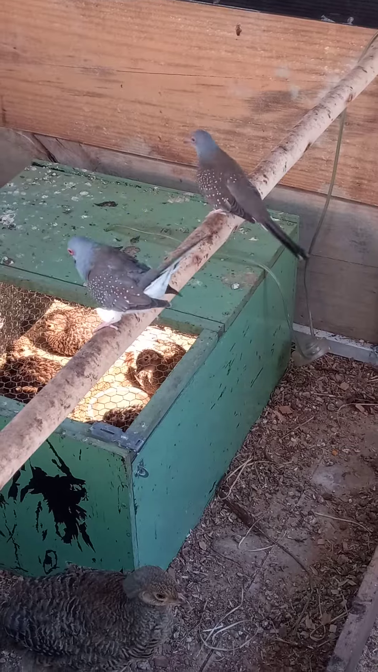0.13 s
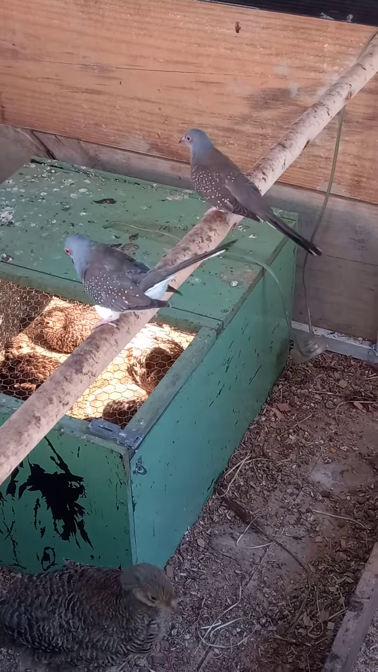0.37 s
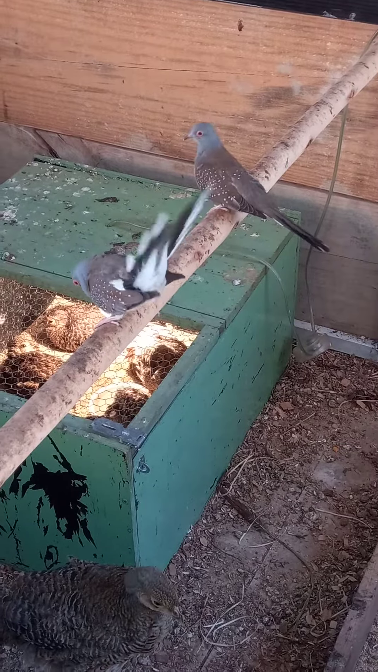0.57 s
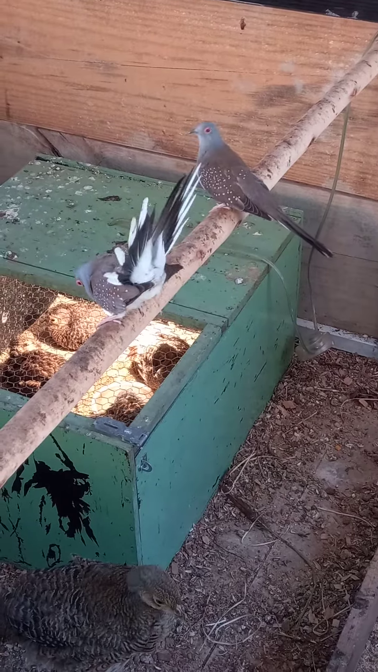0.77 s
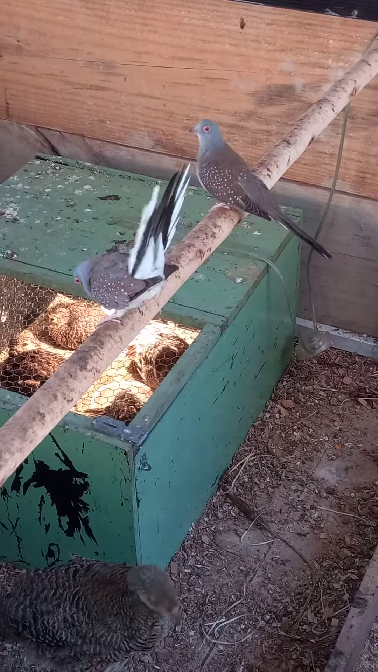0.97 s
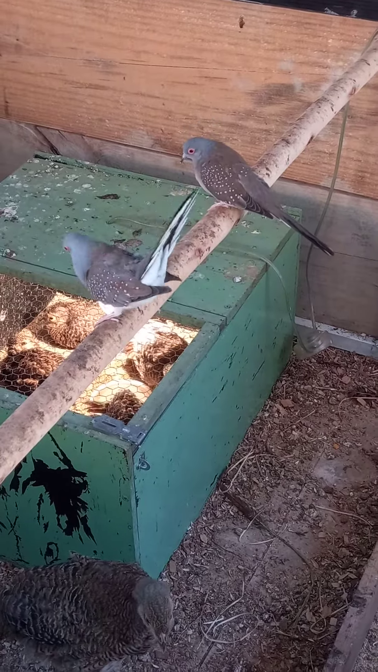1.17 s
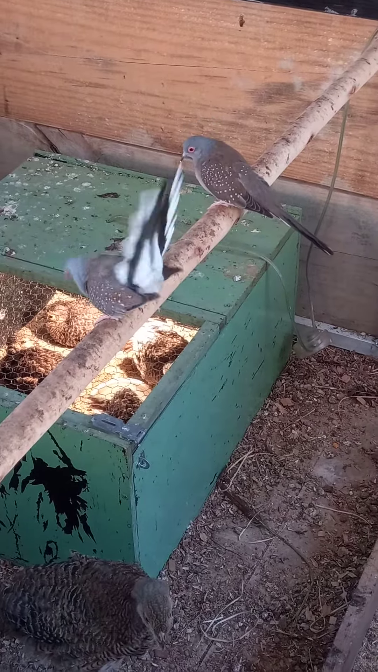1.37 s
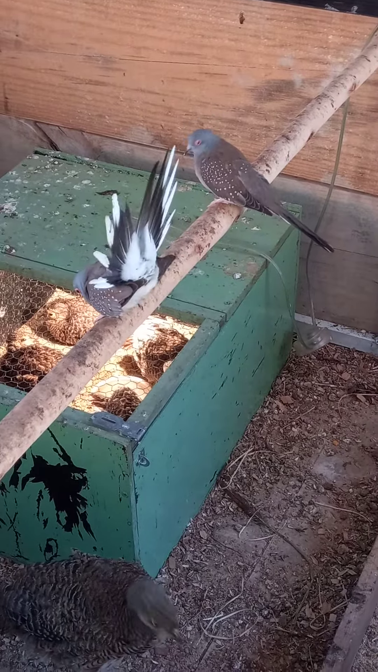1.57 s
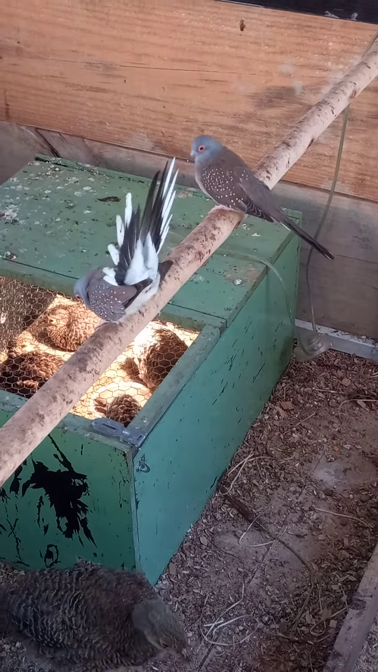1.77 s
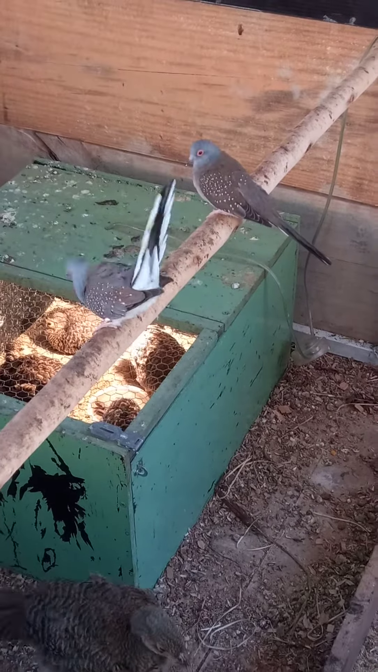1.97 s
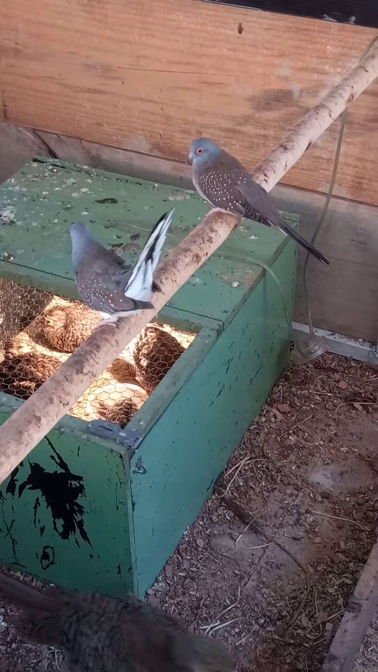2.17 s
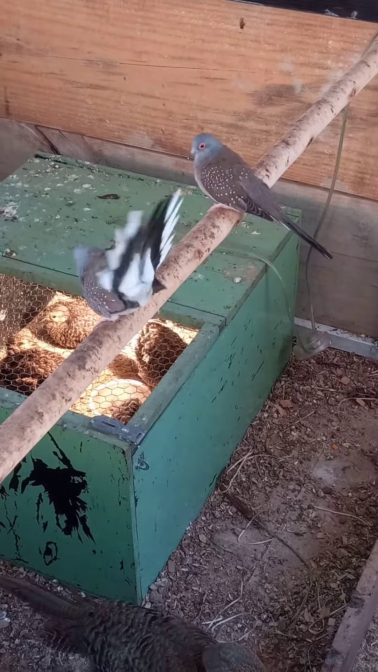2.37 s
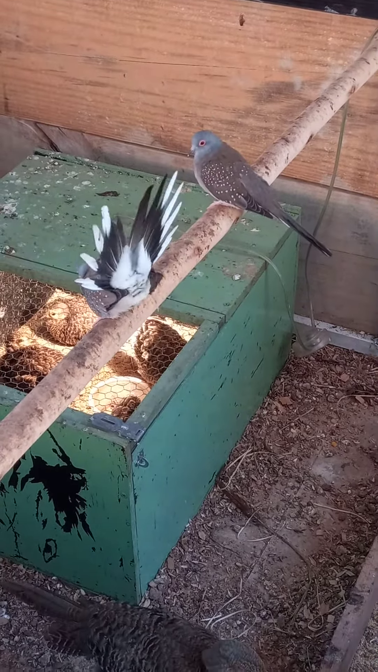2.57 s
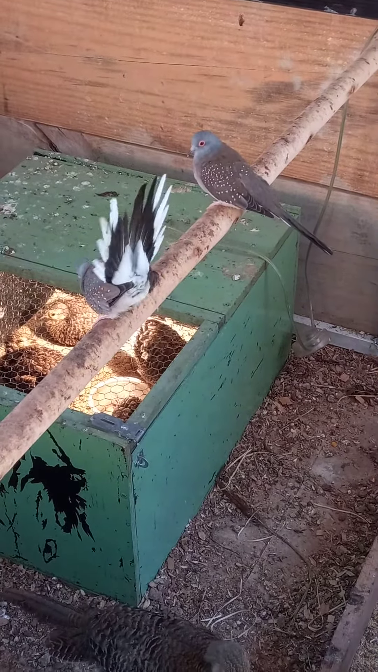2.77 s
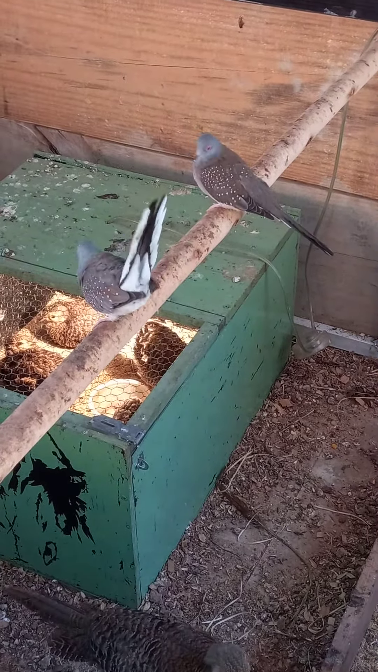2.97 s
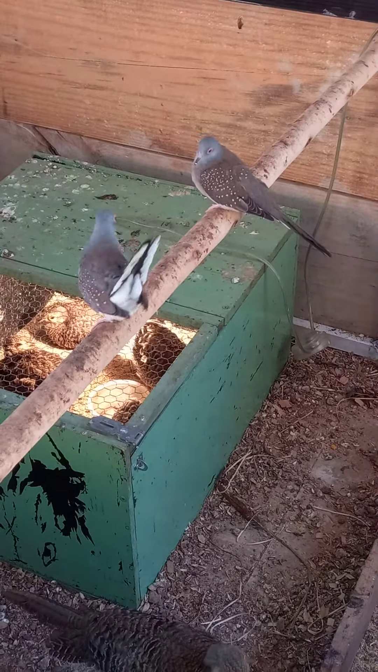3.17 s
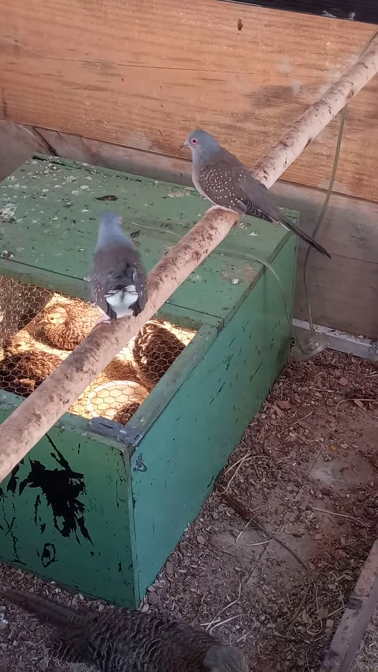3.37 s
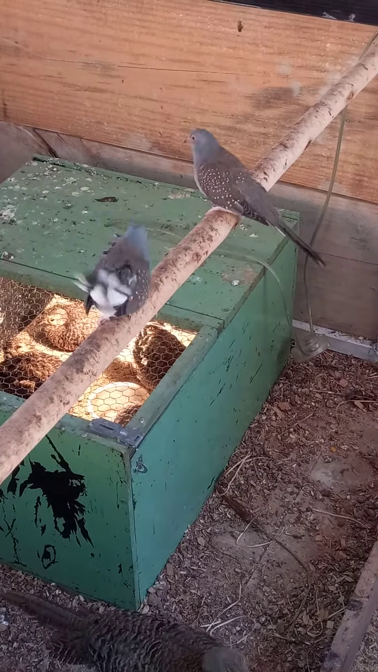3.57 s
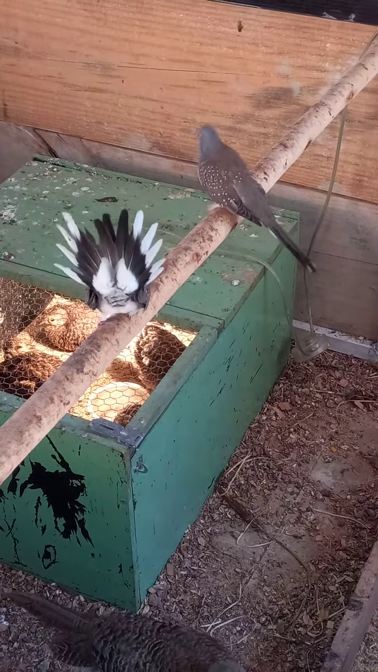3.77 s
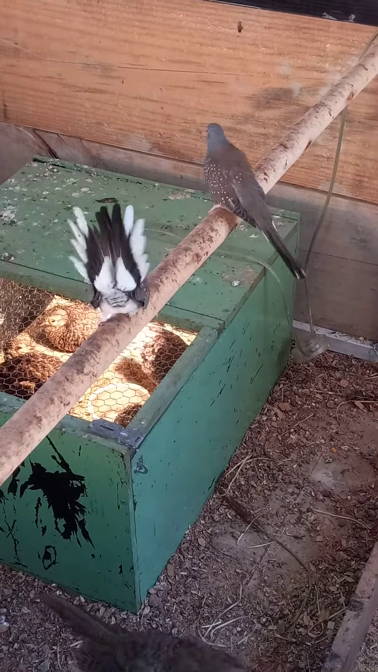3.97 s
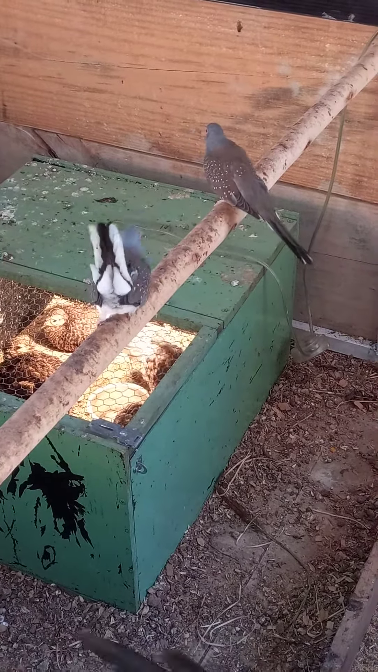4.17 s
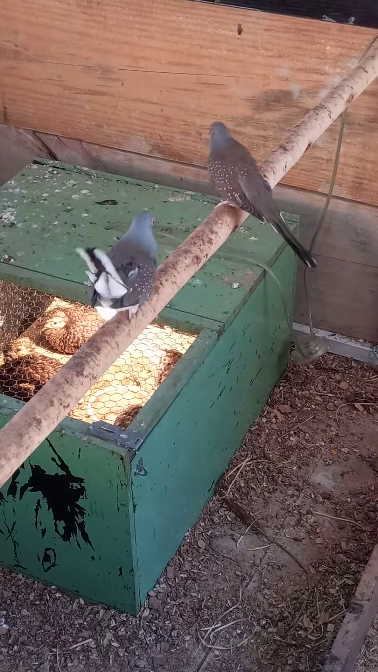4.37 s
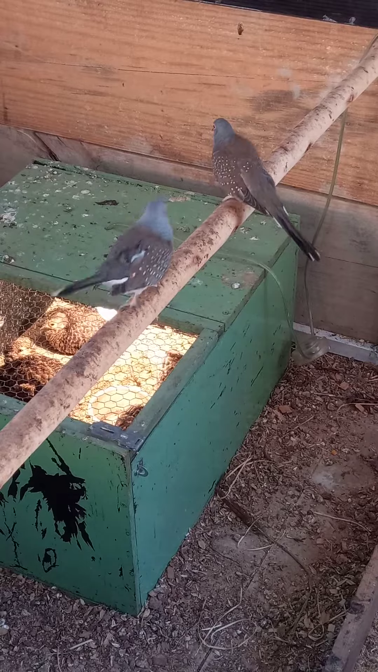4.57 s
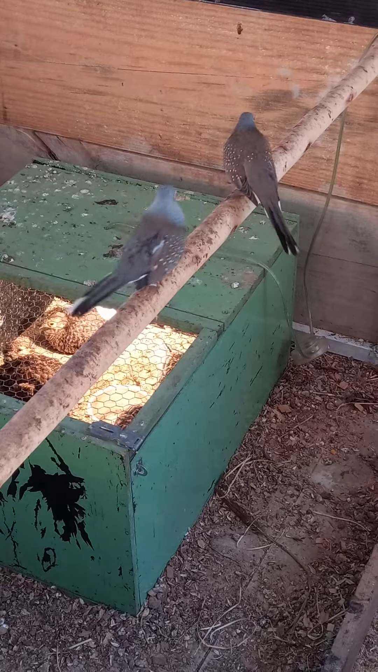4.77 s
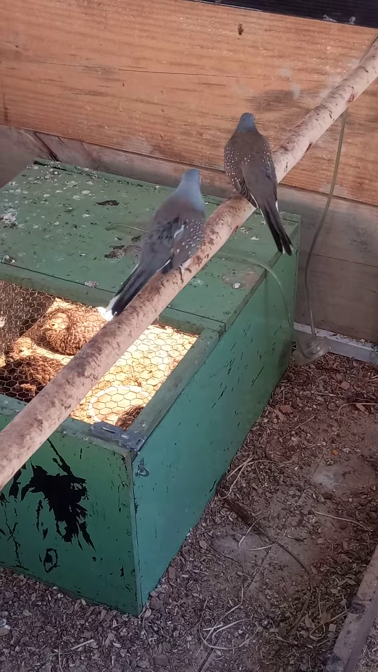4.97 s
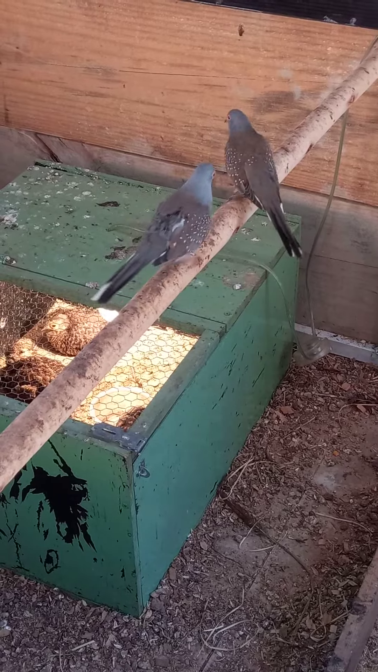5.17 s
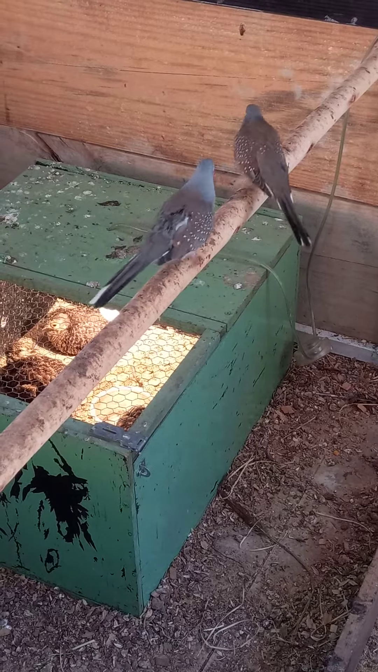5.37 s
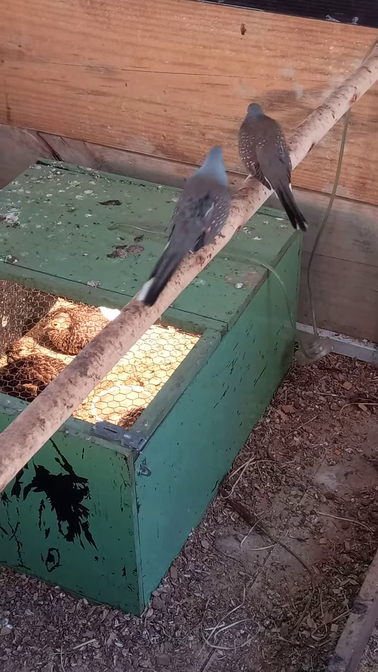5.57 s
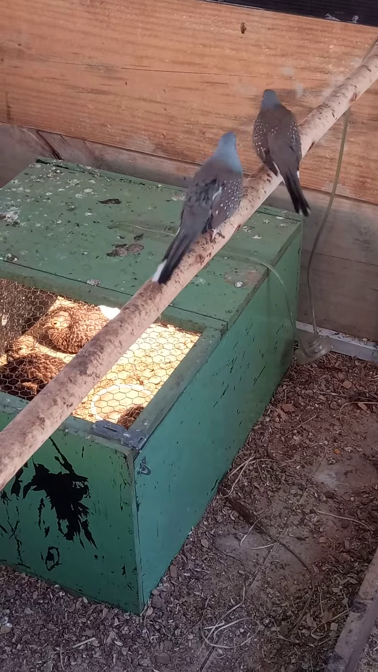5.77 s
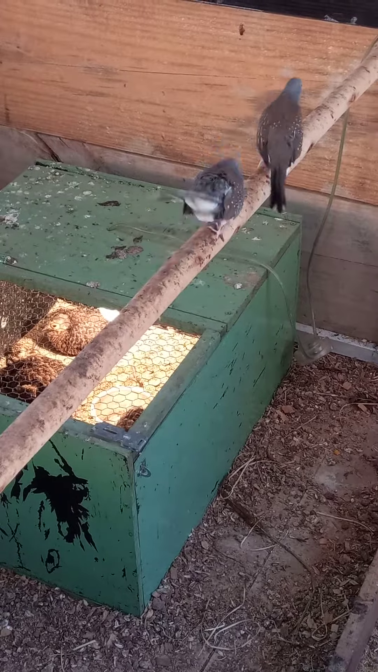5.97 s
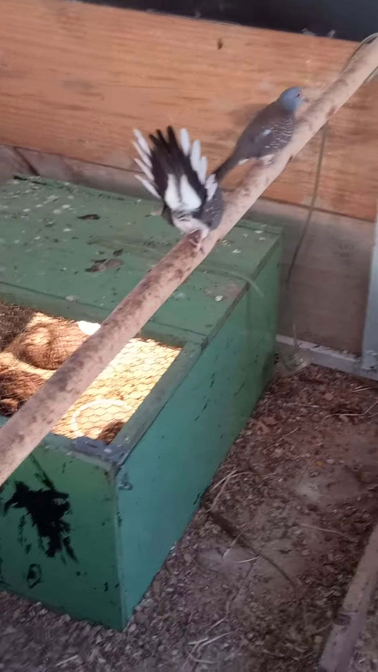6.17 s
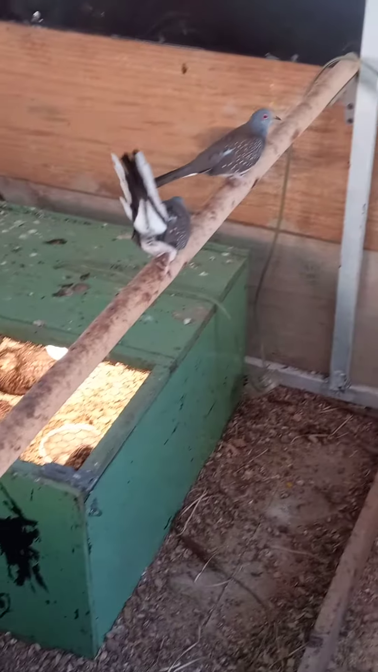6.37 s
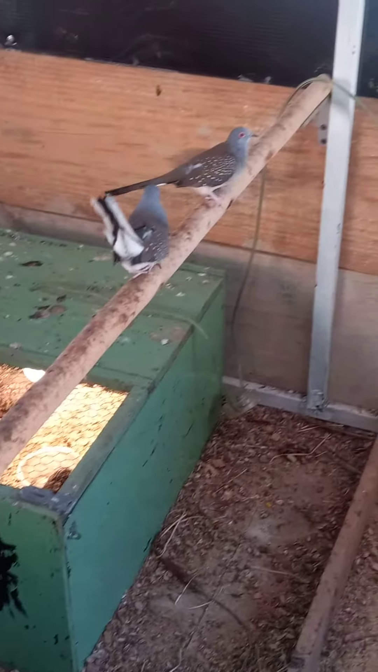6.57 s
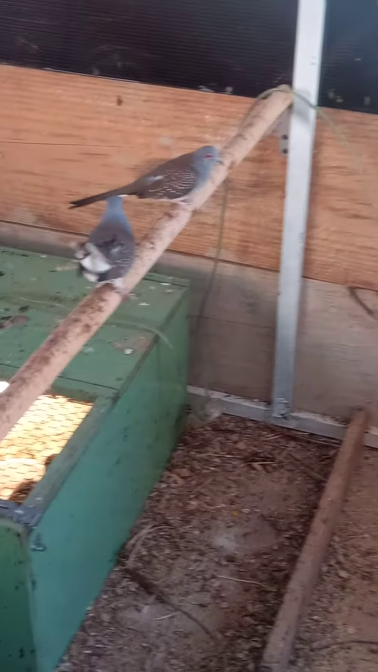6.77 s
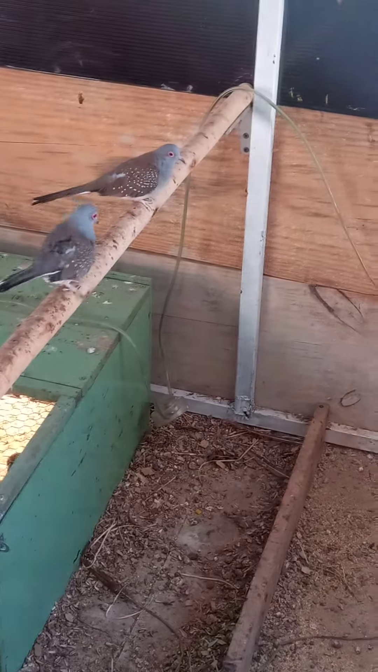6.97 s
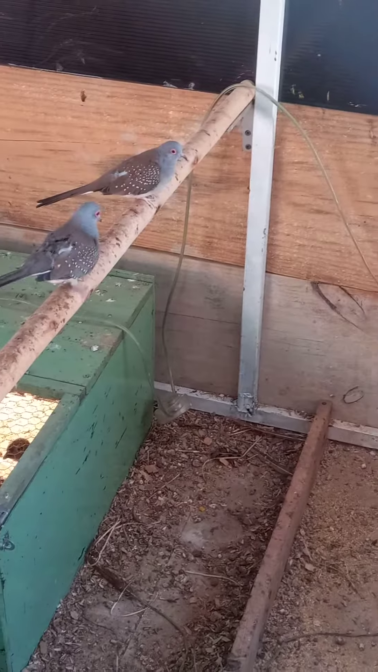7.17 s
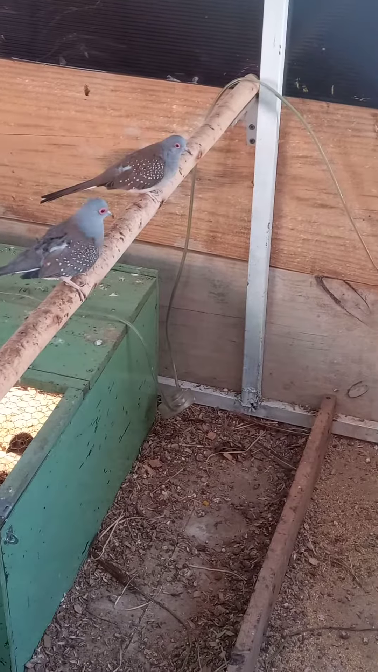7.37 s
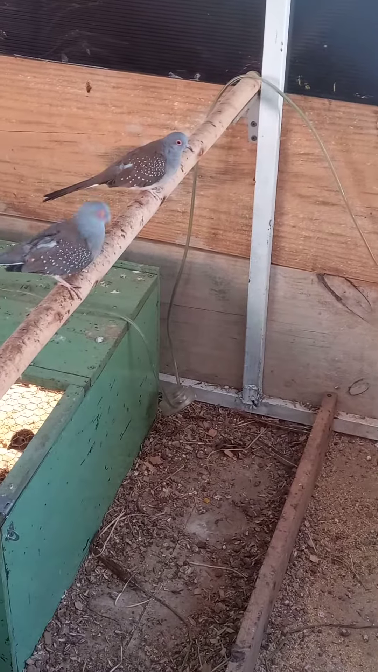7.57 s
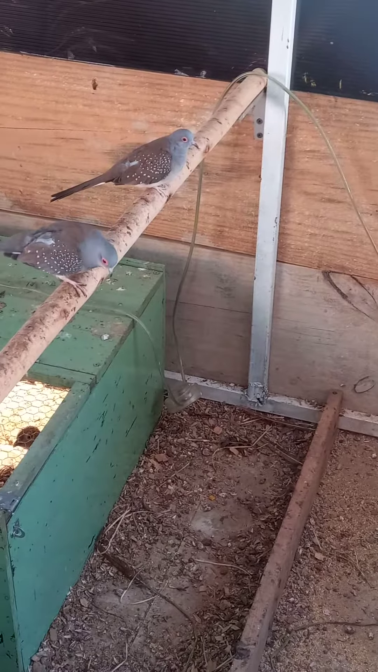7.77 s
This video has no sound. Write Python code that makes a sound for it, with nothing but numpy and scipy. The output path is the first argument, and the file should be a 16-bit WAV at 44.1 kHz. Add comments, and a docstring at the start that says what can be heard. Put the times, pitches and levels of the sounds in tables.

```python
"""Cooing dove in an aviary

A bowing diamond dove coos six times in a wooden aviary, the first coo already under way: tones edged by rasps.
The voice is a gliding sine; in the rasps a lower sine and throat pulses roughen it. A second dove answers softly.
Shaped noise makes rustling feathers and litter, wing puffs and clicks; decaying sines knock on the perch.
Small birds chirp in sine glides, twitter and pip, over rumble, a passing hum and hiss."""
import sys
import numpy as np
from scipy import signal
from scipy.fft import rfft, irfft, next_fast_len
from scipy.io import wavfile
from scipy.ndimage import map_coordinates

SR = 44100
rng = np.random.default_rng(int(sys.argv[2]) if len(sys.argv) > 2 else 0)


def bounce(signal):
    """Save signal as a 16-bit WAV file at the path given by the first command-line argument."""
    frames = np.transpose(np.atleast_2d(signal))
    limited = np.clip(frames, -1, 1)
    pcm = np.round(limited * 32767).astype(np.int16)
    wavfile.write(sys.argv[1], SR, pcm)


N = 344761
TIME = np.arange(N) / SR  # s

# Event levels and spectra are relative settings; each source trims its own mix.
# main dove's coos: [t/s, opening rasp/s, clear tone/s, closing rasp/s, fade t60/s,
# opening level/dB, tone level/dB, closing level/dB, top f/Hz, held f/Hz, f at the break/Hz]
COOS = [(-.42, .15, .41, 0.11, 0.35, -40.5, -36.5, -35, 852, 845, 827.8),
        (.607, 0.093, .42, 0.074, 0.23, -38.5, -38, -34, 856, 834.4, 806),
        (1.496, 0.093, 0.39, 0.12, .26, -36, -38, -34, 850.7, 817, 814),
        (2.504, 0.1678, 0.3016, 0.075, .25, -36, -34, -37, 828.2, 805, 800),
        (3.738, 0.149, .29, 0.085, .38, -34, -36, -34.5, 842, 814, 818),
        (6.049, 0.16, 0.33, 0.12, 0.2, -38.5, -33.5, -35.5, 849, 827.6, 832)]
# vocal effort through a coo: [stage (0 start, 1 clears, 2 breaks, 3 fades), tone level/dB]
EFFORT = [(0, -5.5), (.9, -4), (1.3, -0.5), (1.55, -0.5), (1.75, -4), (1.97, -0.5), (2.3, -2.5), (3, -4.5)]
# left-right balance of the main dove's voice, positive to the left: [t/s, level/dB]
BALANCE = [(.2, -2), (.8, -2.5), (1.3, -1.1), (1.8, -4), (2.1, 1), (2.75, -4), (3.3, -8), (3.8, -0.1),
           (4.2, -8), (6.1, -2), (6.4, 2.5), (6.7, 0)]
# ring of the inflated throat: [f/Hz, level/dB]
THROAT = [(300, -45), (430, -33), (495, -24), (560, -32.5), (615, -15), (670, 1.5), (735, -7), (820, -8),
          (880, -17.5), (950, -21.5), (1050, -30.5), (1300, -44), (2000, -77)]
# second dove's sinking coos: [t/s, length/s, starting f/Hz, level/dB, fade/(dB per s), octave level/dB]
ANSWERS = [(1.972, 0.37, 765.8, -46.5, 0.5, -54.5), (2.918, 0.4, 769.7, -38.5, 27, -54)]
# second dove's lone rasps: [t/s, length/s, level/dB]
SOFT_RASPS = [(5.04, .11, -58.5), (5.336, 0.081, -61)]
# rasp colour of the farther throat: [f/Hz, level/dB]
FAR_THROAT = [(350, -44), (560, -13.5), (660, 3), (770, -0.5), (860, -11.5), (1000, -15), (1800, -47.5)]
# strokes through litter and feathers: [t/s, rise/s, t60/s, coarse level/dB, fine level/dB]
RUSTLE_STROKES = [(1.086, 0.023, .77, -64, -87.5), (1.39, 0.12, .5, -55.5, -71.5),
                  (1.702, 0.034, 0.66, -66, -71.5), (2.001, 0.09, 1, -69.5, -85.5),
                  (2.22, 0.18, 0.44, -71, -86.5), (2.608, 0.0026, 0.87, -50, -61),
                  (2.859, 0.012, 0.77, -60.5, -61.5), (2.971, .06, 0.29, -60.5, -66.5),
                  (3.11, .03, 0.98, -66, -83), (3.441, .036, 1, -62, -70), (3.65, .07, 0.67, -60.5, -75),
                  (3.979, .05, 0.74, -67, -81), (4.178, 0.0042, 0.7, -79, -79),
                  (4.251, 0.042, .52, -44, -69), (4.468, 0.0054, 0.27, -86, -76),
                  (4.624, 0.036, 0.52, -49.5, -64), (5.43, .016, 0.94, -67.5, -100.5),
                  (6.15, 0.024, 0.99, -62, -82), (6.368, .05, 1, -74.5, -79.5),
                  (6.62, 0.071, 0.59, -66, -78.5), (7.67, 0.034, .5, -75, -92)]
# coarse rub of litter: [f/Hz, level/dB]
LITTER = [(600, -35.5), (1000, -11.5), (1300, -1), (1650, -1), (2100, 5.5), (2500, -7.5), (3000, -15.5),
          (4300, -17.5), (5300, -27), (6700, -23), (7600, -37), (12000, -76.5)]
# fine rub of feathers: [f/Hz, level/dB]
FEATHER = [(2000, -41.5), (3500, 2.5), (5000, 3.5), (6700, 8), (7500, -5), (11000, -6), (15500, -11)]
# air pushed by wings and the fanned tail: [t/s, rise/s, t60/s, level/dB]
FLAP_STROKES = [(1.39, .13, 0.55, -48.5), (1.69, 0.056, .5, -52.5), (1.93, 0.015, 1, -67.5),
                (2.71, .04, .3, -63), (2.85, 0.063, 0.14, -52), (2.99, 0.066, 0.28, -40),
                (3.64, 0.059, .42, -51.5), (3.98, 0.046, 1, -55), (4.24, .06, 0.77, -53.5),
                (5.43, 0.018, 0.25, -68.5), (6.11, .02, .8, -65), (6.35, 0.03, 0.54, -60.5)]
# colour of the pushed air: [f/Hz, level/dB]
PUFF = [(30, -43), (55, -9), (82, 3.5), (130, 4), (200, -1.5), (340, 3.5), (480, -5.5), (900, -9.5),
        (1500, -13), (3000, -65.5)]
# feet on the perch: [t/s, thud level/dB, tick level/dB]
FOOTFALLS = [(1.45, -37.5, -61), (1.519, -57.5, -72.5), (2.028, -47, -78), (2.768, -44.5, -63),
             (2.978, -40, -38.5), (3.04, -28, -44.5), (3.066, -38, -65.5), (3.09, -37.5, -60.5),
             (4.516, -43, -78), (4.827, -51.5, -75), (6.392, -39, -73.5), (6.79, -49, -86.5)]
# modes of the pole: [f/Hz, level/dB, t60/s]
PERCH_MODES = [(83.5, 5.5, 0.2), (139.5, -7, 0.62), (196, -5, .15), (335, -11, 0.071), (440, -13.5, 0.14)]
# snaps of claws and quills: [t/s, starting level/dB, left-right level/dB]
SNAPS = [(0.891, -64, 7), (2.6183, -57, 9.5), (2.8648, -53.5, 13.5), (3.036, -49.5, 11.5), (4.184, -71, 2),
         (4.4704, -65, 10.5), (4.629, -69, 10.5), (7.188, -67, 8.0)]
# whistles and soft low notes: [t/s, length/s, start f/Hz, end f/Hz, level/dB,
# left-right level/dB, distance (0 near to 1 far)]
CHIRP_NOTES = [(.36, .08, 4510, 3680, -72, -11, .8), (0.511, 0.096, 575.5, 540, -54.5, -5, 1),
               (0.594, 0.07, 1693, 4120, -58, -8.5, 0.68), (1.382, .089, 599, 586, -55, -1, 0.34),
               (1.469, 0.064, 1685, 2380, -50, -12, 0.7), (1.525, 0.07, 2525, 4420, -64, 8, .5),
               (2.236, .13, 1436, 2220, -64.5, -18, 1), (2.368, .08, 2590, 4250, -65, 3, 0.53),
               (2.56, 0.046, 1660, 2770, -60.5, -11.5, .9), (2.671, 0.023, 2160, 1750, -34, -16, 0.19),
               (3.537, 0.046, 1680, 2514, -49, -15, .5), (3.559, 0.036, 2500, 4450, -64, 6, 1),
               (4.487, .043, 1880, 3570, -63.5, -4, 0.33), (3.651, 0.081, 311, 331, -52, -2.5, .5),
               (4.81, 0.053, 463, 500, -63.5, -6, 0.74), (5.088, 0.071, 5200, 4080, -65.5, 5, 0.7),
               (5.401, 0.042, 1905, 3260, -69.5, -4, 0.65), (5.502, .075, 2820, 4940, -69.5, 7, 0.77),
               (5.635, 0.057, 2800, 1650, -57, -15, .5), (5.695, 0.069, 1667, 1663, -51.5, -7, 0.49),
               (5.697, 0.039, 4874, 5275, -66, 13, 0.87), (6.015, 0.14, 395, 460, -52.5, -13, 0.35),
               (6.469, 0.078, 5010, 3490, -67.5, -12, 0.99), (7.23, 0.14, 4530, 3560, -72.5, -4, 0.86),
               (7.663, .096, 1750, 2146, -69.5, -13, 0.96)]
# bouts of distant twitter: [t/s, length/s, t60/s, level/dB]
TWITTER_BOUTS = [(0, .45, .5, -80.5), (0.491, 0.3, 0.38, -73), (1.54, 0.26, .2, -79.5),
                 (3.44, 0.18, .3, -76), (6.145, .04, 0.61, -72), (6.35, 0.32, 1.5, -71.5),
                 (7.172, 0.16, 1.3, -75.5), (7.702, .05, .6, -82.5)]
# colour of distant twitter: [f/Hz, level/dB]
FAR_BIRDS = [(2400, -36), (3400, -11.5), (4300, -6.5), (5200, -8), (6500, -35)]
# nasal finch pips: [t/s, level/dB]
FINCH_PIPS = [(6.33, -69), (6.618, -64), (6.881, -69), (7.18, -66), (7.439, -80.5), (7.71, -74)]
# colour of the outdoor rumble: [f/Hz, level/dB]
AIR = [(20, -39), (45, -20), (82, 0.5), (115, -3.5), (165, -16.5), (245, -16.5), (400, -19), (700, -23),
       (1100, -28), (2200, -74.5)]
# strength of the outdoor rumble: [t/s, level/dB]
AIR_LEVEL = [(0, -62.5), (.6, -69.5), (1.2, -61), (2.3, -63.5), (3.5, -61), (4.9, -67.5), (5.9, -64),
             (6.7, -65), (7.1, -70.5), (7.8, -70)]
# passing low hum: [t/s, length/s, t60/s, level/dB, start f/Hz, f once the length is up/Hz]
HUM_PASSES = [(4.193, .32, 0.38, -48, 109.5, 111), (5.318, 0.42, 1.6, -57, 109.5, 116.8)]
# colour of the fine hiss: [f/Hz, level/dB]
HISS = [(500, -3), (1000, 5), (1500, 13), (2100, 18.5), (2900, 2.5), (5000, 0), (6700, 6.5), (7400, -10),
        (11000, -4), (15500, 0)]
# echo decay of the aviary: [f/Hz, t60/s]
AVIARY = [(200, 0.28), (800, 0.35), (2000, 0.29), (5000, 0.54), (12000, 0.092)]

# Main dove: rise into the voice and into the closing rasp (s), fade of the opening rasp (t60, s)
ATTACK_S, BREAK_S, CLEARING_T60 = .045, .04, .25
START_HZ, END_HZ = 817, 800  # pitch in the opening and closing rasp
# the pitch lifts before the tone clears, crests after, and settles this far into the tone
LIFT_S, CREST_S, SETTLE_SHARE = 0.03965, 0.033, .6
FADE_CURVE = 1.59  # a coo dies away slowly at first, then ever faster
HUSK_DB = -27  # rasp under the clear tone, relative to it
TREMBLE_S, TREMBLE_DB = 0.061, -17.5  # rasp ahead of the break, relative to the closing rasp
DOVE_ECHO_DB = -16
# Second dove
SAG_HZ_PER_S, OCTAVE_FADE_DB_PER_S = 110, 57
SOFT_RISE_S, SOFT_T60 = 0.072, 0.81  # s
# Others
FEATHER_CLUMP_DB = 1.8  # depth of the slow clumping
TWITTER_RISE_S, HUM_RISE_S = 0.014, .12
TOP_HZ = 15700  # band limit


def dove(low_hz=672, flutter_hz=20, shake_db=7.0, pulse_rate=140, scatter=.2):
    """A pure voice; in the rasp a second, lower vibration beats against it, with uneven throat pulses."""
    clear, rasp, pitch = coo_controls()
    rough = np.clip(1.54 * rasp / (rasp + clear + 1e-9), 0, 1)
    phase = cycle(pitch + 2.5 * wobble(30) + rough * flutter_hz * wobble(170))
    shake = rough * (shake_db * np.tanh(wobble(150)) - 2.0)
    upper = amp(1.2 * wobble(31) + shake) * clear * np.sin(phase)
    lower_gain = amp(-0.65 + 1.9 * np.tanh(wobble(110)))
    lower = lower_gain * np.sin(cycle(low_hz + 8 * wobble(17) + 17 * wobble(160)))
    # each pulse, about pulse_rate a second, rings the inflated throat
    count = np.floor(np.cumsum(pulse_rate * np.exp(scatter * wobble(140))) / SR)
    pulses = coloured(np.diff(count, prepend=0), THROAT)
    # a breathy noise follows the rasp, opposite in sign at left and right, and widens it
    breath = amp(-8.5) * coloured(rng.standard_normal(N), THROAT) * np.array([[1], [-1]])
    voice = upper * amp(3.0) + rasp * (lower + amp(-5) * pulses + breath)
    return room(placed(voice, track(BALANCE)), wet_db=DOVE_ECHO_DB)


def coo_controls():
    """Each coo rasps, clears at its top pitch, sags and breaks into a rasp: tone gain, rasp gain and pitch."""
    clear, rasp, pitch = np.zeros((3, N))
    for s, opening, tone, closing, t60, open_db, tone_db, close_db, top_hz, held_hz, break_hz in COOS:
        clears, breaks, fades = s + np.cumsum([opening, tone, closing])
        stage = np.interp(TIME, [s, clears, breaks, fades], np.arange(4))
        effort_db = np.interp(stage, *np.transpose(EFFORT))
        clear += amp(tone_db + effort_db) * swell(s, ATTACK_S, fades - s, t60, FADE_CURVE)
        rasp += amp(open_db) * swell(s, ATTACK_S, opening, CLEARING_T60)
        rasp += amp(close_db) * swell(breaks, BREAK_S, closing, t60, FADE_CURVE)
        # the tone roughens just before it breaks
        rasp += amp(close_db + TREMBLE_DB) * swell(breaks - TREMBLE_S, TREMBLE_S, TREMBLE_S, CLEARING_T60)
        moments = [clears - LIFT_S, clears + CREST_S, clears + SETTLE_SHARE * tone, breaks, breaks + BREAK_S]
        glide = np.interp(TIME, moments, [START_HZ, top_hz, held_hz, break_hz, END_HZ])
        pitch = np.where(TIME >= s, glide, pitch)
    return clear, rasp + amp(HUSK_DB) * clear, pitch


def second_dove(rise=0.054, t60=0.2, waver_hz=17, husk_db=-9):
    """A softer, husky coo from farther off sinks in pitch with a fading octave; later only its rasp."""
    voice, waver = np.zeros(N), waver_hz * wobble(110)
    rasp = sum(amp(db) * swell(s, SOFT_RISE_S, length, SOFT_T60) for s, length, db in SOFT_RASPS)
    for s, length, hz, db, fade, octave_db in ANSWERS:
        t = np.clip(TIME - s, 0, 1)
        phase = cycle(hz - SAG_HZ_PER_S * t + waver)
        envelope = swell(s, rise, length, t60)
        tone = amp(db - fade * t) * np.sin(phase)
        octave = amp(octave_db - OCTAVE_FADE_DB_PER_S * t) * np.sin(2 * phase)
        voice += envelope * (tone + octave)
        rasp += envelope * amp(db - fade * t + husk_db)
    husk = rasp * coloured(rng.standard_normal(N), FAR_THROAT) * amp(-3)
    voice = voice * amp(3.0 * wobble(50) - 0.5) + husk
    return room(placed(voice, -1.3), wet_db=0)


def rustle(coarse_grain_db=4, fine_grain_db=5):
    """Each stroke swells and dies away; litter and feathers rub in clumps of tiny grains."""
    coarse, fine = np.zeros((2, N))
    t = np.arange(SR) / SR
    for s, rise, t60, coarse_db, fine_db in RUSTLE_STROKES:
        stroke = np.minimum(t / rise, 1) * amp(-60 * np.maximum(t - rise, 0) / t60)
        add(coarse, s, amp(coarse_db) * stroke)
        add(fine, s, amp(fine_db) * stroke)
    litter_grain = amp(coarse_grain_db * wobble(900) + wobble(60))
    litter = coloured(noise(0.94) * litter_grain, LITTER)
    feather_grain = amp(fine_grain_db * wobble(1300) + FEATHER_CLUMP_DB * wobble(62))
    feathers = coloured(noise(1.0) * feather_grain, FEATHER)
    return placed(litter * coarse * amp(1), -9.5) + placed(feathers * fine * amp(3.5), 3.6)


def flaps():
    """Wing and tail strokes push soft low puffs of air."""
    strokes = sum(amp(db) * swell(s, rise, rise, t60) for s, rise, t60, db in FLAP_STROKES)
    puffs = coloured(noise(0.53) * amp(2.4 * wobble(45)), PUFF)
    return placed(puffs * strokes * amp(2.5), -3.0)


def knocks(tick_t60=0.033):
    """Feet strike the perch: a claw tick and the dull modes of the pole."""
    thuds, ticks = np.zeros(N), np.zeros((2, N))
    t = np.arange(SR // 2) / SR
    for s, thud_db, tick_db in FOOTFALLS:
        # every strike excites the modes slightly differently
        ring = sum(amp(db + rng.normal(0, 0.44) - 60 * t / t60) * np.sin(2 * np.pi * hz * t)
                   for hz, db, t60 in PERCH_MODES)
        add(thuds, s, amp(thud_db - 9.5) * ring * (1 - np.exp(-t / 0.0011)))
        add(ticks, s, amp(tick_db - 60 * t / tick_t60) * rng.standard_normal((2, len(t))))
    tick_colour = [(200, -4.5), (1000, 6.5), (2200, 1.5), (3200, -13), (7000, -25.5), (15000, -23.0)]
    ticks = coloured(ticks, tick_colour) * ticks.std()  # keeps the overall tick level
    return room(placed(thuds, -7.0) + ticks, wet_db=-5.5)


def clicks(click_t60=.005):
    """Claws and quills give single bright snaps, each a very short noise burst."""
    snaps, t = np.zeros((2, N)), np.arange(SR // 20) / SR
    for s, db, pan_db in SNAPS:
        burst = amp(db - 8.5 - 60 * t / click_t60) * rng.standard_normal((2, len(t)))
        add(snaps, s, placed(burst, pan_db))
    bright = filtered(snaps, lambda hz: amp(along([(1000, -18), (5000, -2), (15000, -0.5)], hz)))
    return room(bright, wet_db=-9)


def chirps(flutter=0.045):
    """Small birds whistle quick, even glides; the far ones arrive blurred, mostly as echo."""
    direct, distant = np.zeros((2, 2, N))
    waver = wobble(700)
    for s, length, start_hz, end_hz, db, pan_db, distance in CHIRP_NOTES:
        u, far = np.linspace(0, 1, int(length * SR)), np.clip(distance, 0, 1)
        hz = start_hz * (end_hz / start_hz) ** u
        hz = hz * (1 + flutter * far * waver[round(s * SR):][:len(u)])
        note = placed(amp(db) * np.sin(np.pi * u) * np.sin(cycle(hz)), pan_db)
        add(direct, s, (1 - far) * note)
        add(distant, s, far * note)
    return direct + room(distant * amp(-7.5), wet_db=11.5)


def far_birds(finch_hz=2120, finch_length=0.04):
    """Warbling twitter smeared by echoes, and a finch's buzzy pips built on overtones 2 to 4."""
    glides = signal.sawtooth(2 * np.pi * 6 * TIME + wobble(3.9))  # notes that fall, about six a second
    warble = np.sin(cycle(4050 - 450 * glides + 220 * wobble(70) + 300 * wobble(900)))
    bouts = sum(amp(db) * swell(s, TWITTER_RISE_S, length, t60) for s, length, t60, db in TWITTER_BOUTS)
    twitter = coloured(room(placed(warble, 0), wet_db=5), FAR_BIRDS) * bouts
    pips, u = np.zeros(N), np.linspace(0, 1, int(finch_length * SR))
    for s, db in FINCH_PIPS:
        add(pips, s, amp(db) * np.sin(np.pi * u))
    phase = cycle(finch_hz + 130 * wobble(700))
    pips *= amp(-3) * np.sin(2 * phase) + np.sin(3 * phase) + amp(-17) * np.sin(4 * phase)
    return placed(twitter * amp(3.5), -8) + room(placed(pips * amp(-3.5), 2), wet_db=4.5)


def background():
    """Outdoor rumble with a faint passing hum that bends in pitch, and a fine hiss."""
    air = coloured(noise(0.34), AIR) * amp(track(AIR_LEVEL) + 2.4 * wobble(6))
    hum = np.zeros(N)
    for s, length, t60, db, start_hz, end_hz in HUM_PASSES:
        bend = np.clip((TIME - s) / length, 0, 2) ** 2  # goes on bending through the fade
        tone = np.sin(cycle(start_hz + (end_hz - start_hz) * bend))
        hum += amp(db) * swell(s, HUM_RISE_S, length, t60) * tone
    hiss = coloured(noise(1.0), HISS) * amp(-74.5 + 2.4 * wobble(3.3))
    return placed(air + hum * amp(2.5 + wobble(6.9)), -3) + placed(hiss, -.5)


def room(x, wet_db):
    """Add the aviary's short echo: noise that decays at its own rate per band, different at each side."""
    hz, t, z = signal.stft(rng.standard_normal((2, SR // 2)), SR, nperseg=256)
    decay = amp(-60 * t / along(AVIARY, hz)[:, None])
    tail = signal.istft(z * decay, SR, nperseg=256)[1]
    tail = unit(tail) / np.sqrt(tail.shape[1])
    return x + amp(wet_db) * signal.fftconvolve(x, tail, axes=1)[:, :N]


def swell(s, rise, length, t60, curve=1):
    """An envelope that rises at s, holds until s + length and dies away."""
    t = TIME - s
    return np.clip(t / rise, 0, 1) * amp(-60 * np.clip((t - length) / t60, 0, 2) ** curve)


def amp(db):
    """Decibels to gain."""
    return 10 ** (np.asarray(db) / 20)


def unit(x):
    """Scale to rms 1."""
    return x / np.sqrt(np.mean(x ** 2) + 1e-20)


def along(points, hz):
    """(Hz, value) points read on a log frequency axis."""
    f, v = np.transpose(points)
    return np.interp(np.log(hz + 1), np.log(f + 1), v)


def track(points):
    """(s, value) points joined through time."""
    return np.interp(TIME, *np.transpose(points))


def wobble(rate):
    """A smooth random curve, rate knots a second."""
    return map_coordinates(rng.standard_normal(int(N * rate / SR) + 4), [TIME * rate])


def cycle(hz):
    """Phase of an oscillator that follows a pitch."""
    return 2 * np.pi * np.cumsum(hz, axis=-1) / SR


def filtered(x, response):
    """x times a response of frequency."""
    m = next_fast_len(N + SR // 2)
    return irfft(rfft(x, m) * response(np.fft.rfftfreq(m, 1 / SR)), m)[..., :N]


def coloured(x, spectrum):
    """x shaped by a spectrum, at rms 1."""
    return unit(filtered(x, lambda hz: amp(along(spectrum, hz))))


def placed(x, pan_db):
    """Share a sound between left and right; positive leans left."""
    gains = amp(np.array([[1], [-1]]) * pan_db / 2)
    return x * gains / gains.mean(axis=0)


def noise(spread):
    """White stereo noise; spread is the side part against the mid."""
    mid, side = rng.standard_normal((2, N))
    return np.array([mid + spread * side, mid - spread * side])


def add(bus, s, sound):
    """Mix a sound into the bus at a time."""
    part = bus[..., max(round(s * SR), 0):][..., :sound.shape[-1]]
    part += sound[..., :part.shape[-1]]


def scene():
    """All the birds and their surroundings."""
    main_bird = dove() + second_dove()
    movement = rustle() + flaps() + knocks() + clicks()
    return main_bird + movement + chirps() + far_birds() + background()


def record(dry, low_cut_hz=38):
    """The recorder thins the deep bass and keeps nothing above its band limit."""
    return filtered(dry, lambda hz: (hz < TOP_HZ) * hz ** 4 / (hz ** 4 + low_cut_hz ** 4))


dry = scene()
out = record(dry)
bounce(out)
```